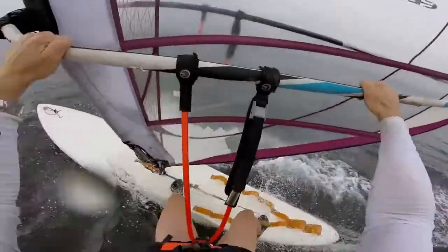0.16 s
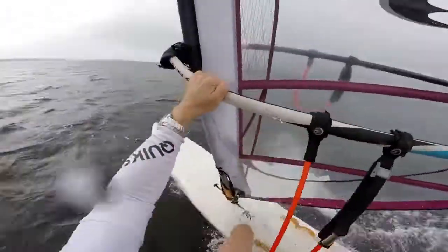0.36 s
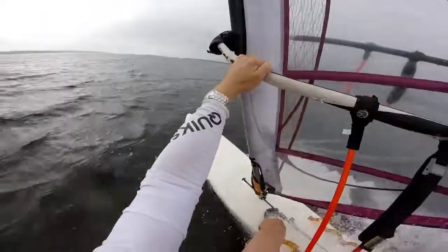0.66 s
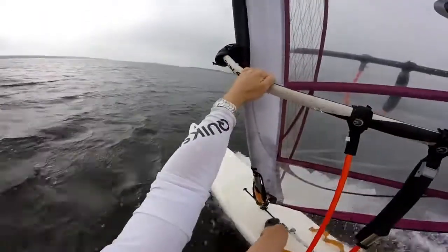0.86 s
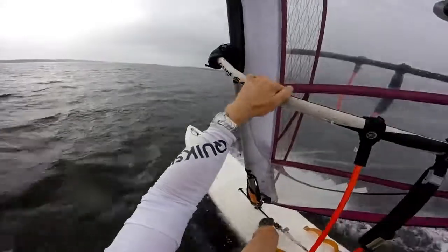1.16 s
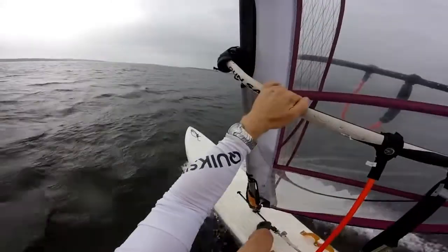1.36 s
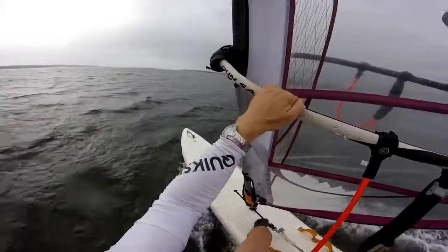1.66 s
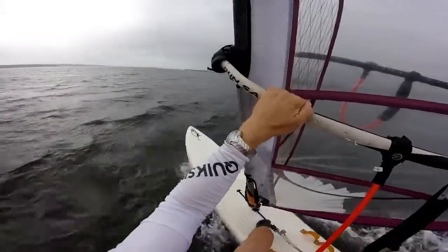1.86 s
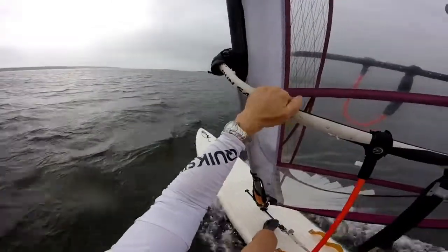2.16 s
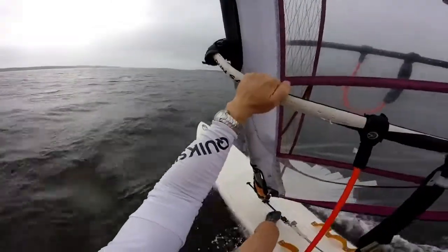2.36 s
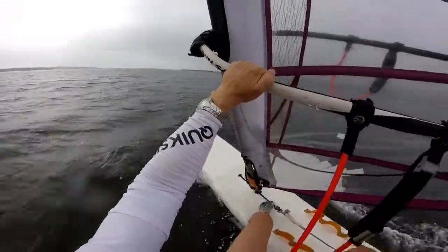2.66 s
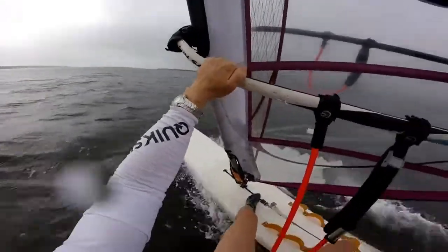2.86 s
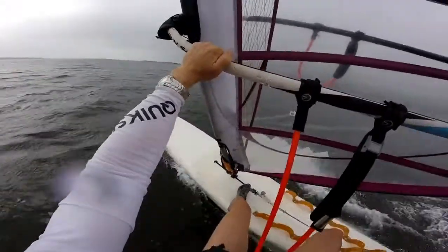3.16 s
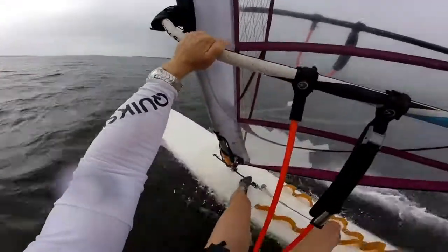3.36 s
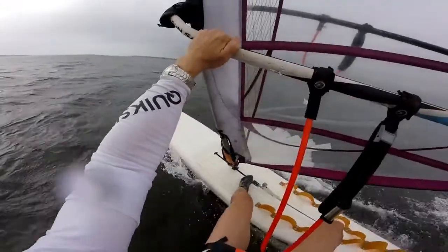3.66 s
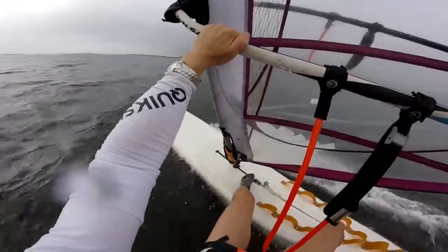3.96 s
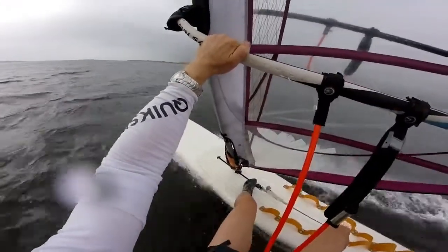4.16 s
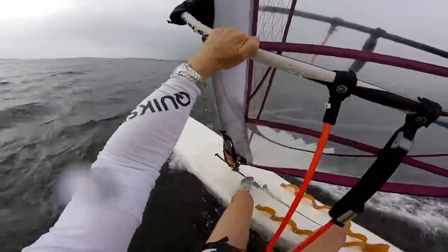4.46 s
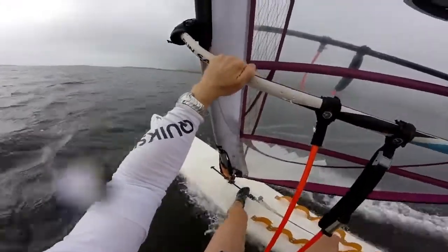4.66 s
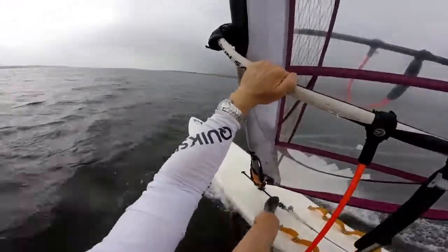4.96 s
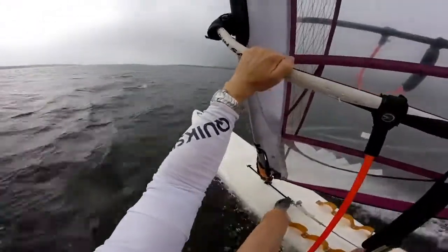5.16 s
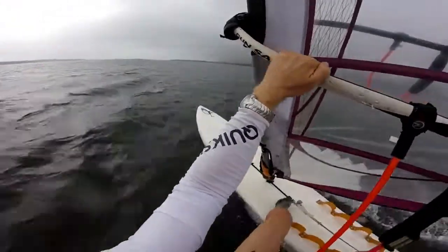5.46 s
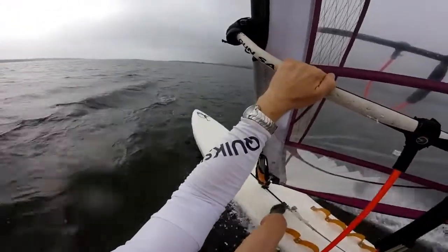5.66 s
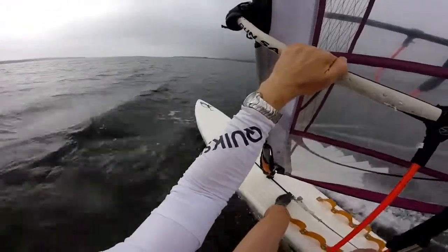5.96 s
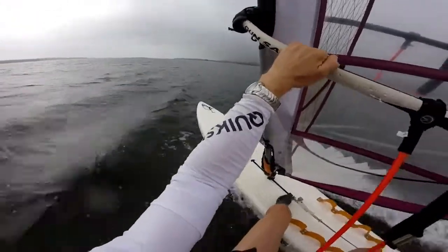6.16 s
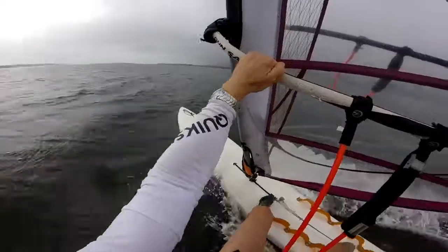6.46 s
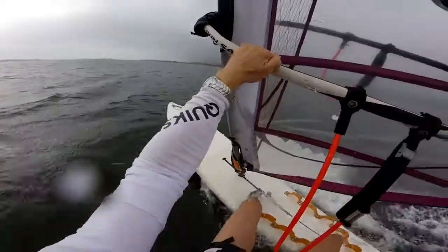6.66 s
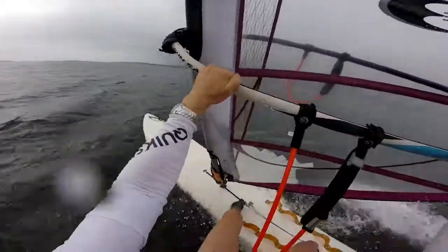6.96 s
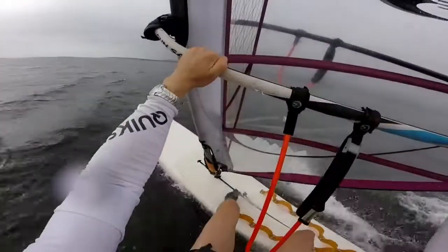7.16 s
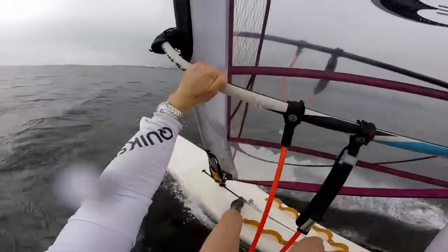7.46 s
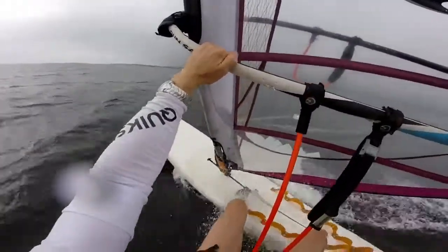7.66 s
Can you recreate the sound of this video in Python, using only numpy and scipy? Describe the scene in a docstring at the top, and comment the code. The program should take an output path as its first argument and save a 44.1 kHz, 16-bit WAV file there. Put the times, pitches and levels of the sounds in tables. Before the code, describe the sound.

On a windsurf board crossing choppy lake water, wind thumps and rumbles irregularly on a sealed camera housing, making its air cavity hum and knock hollowly. Beneath it, foamy water washes along the hull in surges with hissing spray, gurgles and lapping. Brief slaps of chop and small drop ticks punctuate the ride. The sound is close, muffled and single-channel.

```python
"""Wind thumps, rumbles and buffets a sealed camera housing on a windsurfer and excites its air cavity:
shaped noise under gust curves, plus cavity resonances and rings.
Below, lake water washes along the board and sprays (noise, random grains, bubble resonances);
chop slaps the hull (enveloped noise, hull rings) and single drops tick on the case (short pings)."""
import sys
import numpy as np
from scipy import signal
from scipy.io import wavfile
from scipy.ndimage import uniform_filter1d

SR = 44100
rng = np.random.default_rng(int(sys.argv[2]) if len(sys.argv) > 2 else 0)


def to_wav(s):
    """Save 16-bit WAV."""
    ch = np.atleast_2d(s).T  # columns
    pcm = np.round(np.clip(ch, -1, 1) * 32767)  # PCM
    wavfile.write(sys.argv[1], SR, pcm.astype(np.int16))


N = 344862
CONTROL_STEP = 40  # samples between points of slow curves


def from_db(db):
    """Decibels to amplitude gain."""
    return 10 ** (np.asarray(db) / 20)


def rms_one(x):
    """Scale to rms 1."""
    return x / np.sqrt(np.mean(x ** 2) + 1e-20)


def in_time(rows):
    """Interpolate the columns after t/s linearly to every sample."""
    t_s, *columns = np.transpose(rows)
    return [np.interp(np.arange(N) / SR, t_s, column) for column in columns]


def drift(corner_hz):
    """Slow random curve, rms 1: coarse noise through two equal one-pole low-passes."""
    r = np.exp(-2 * np.pi * corner_hz * CONTROL_STEP / SR)
    run_in = 2000
    coarse = rng.standard_normal(N // CONTROL_STEP + run_in + 2)
    slow = signal.lfilter([1], [1, -2 * r, r * r], coarse)[run_in:]
    return np.interp(np.arange(N) / CONTROL_STEP, np.arange(len(slow)), rms_one(slow))


def noise():
    """Two white noises with one second of run-in."""
    return rng.standard_normal((2, N + SR))


def grains(per_s, spread_db):
    """Two trains of random clicks, uneven in size and sign; each train has per_s clicks."""
    sizes = from_db(spread_db * np.minimum(rng.exponential(1, (2, N)), 4))
    signed = sizes * rng.choice([-1, 1], (2, N))
    hits = rng.random((2, N)) < per_s / SR
    return rms_one(signed * hits) + 1e-18


def banded(sources, spectrum, shared_db, own_db, rate_hz):
    """Third-octave bands, sources alternating, flickering together and alone; rms 1."""
    hz, level_db = np.transpose(spectrum)
    out, together = 0, drift(rate_hz)
    edges_hz = 5.6 * 2 ** np.arange(0, 11.7, 1 / 3)
    for k, (low_hz, high_hz) in enumerate(zip(edges_hz, edges_hz[1:])):
        centre_hz = np.sqrt(low_hz * high_hz)
        if .9 * hz[0] < centre_hz < 1.1 * hz[-1]:
            bandpass = signal.butter(2, [low_hz, high_hz], "band", fs=SR, output="sos")
            band = signal.sosfilt(bandpass, sources[k % 2])[-N:]
            band_db = np.interp(np.log(centre_hz), np.log(hz), level_db)
            flicker_db = shared_db * together + own_db * drift(2 * rate_hz)
            out = out + band * from_db(band_db + flicker_db)
    return rms_one(out)


def resonance(x, hz, width_hz):
    """Two-pole resonance, peak gain 1."""
    r = np.exp(-np.pi * width_hz / SR)
    numerator = np.array([1, 0, -1]) * (1 - r * r) / 2
    return signal.lfilter(numerator, [1, -2 * r * np.cos(2 * np.pi * hz / SR), r * r], x)


def pings(rows, rise_s, decay_s, spread):
    """Short decaying sines, each mixed with a noise puff resonating around its pitch."""
    out, t = np.zeros(N + SR), np.arange(SR // 10) / SR
    rise = (t / rise_s) ** 2 / (1 + (t / rise_s) ** 2)
    shape = rise * np.exp(-t / decay_s)
    for start_s, peak_db, hz, noisy in rows:
        width_hz = spread * hz * np.clip(noisy, .1, 1)  # noisier is broader
        puff = shape * rng.standard_normal(len(t))
        for _ in range(2):
            puff = resonance(puff, hz, width_hz)
        tone = np.sin(2 * np.pi * hz * t) * shape
        share = np.clip(noisy, 0, 1)
        ping = (1 - share) * rms_one(tone) + share * rms_one(puff)
        out[round(start_s * SR):][:len(t)] += from_db(peak_db) * ping / np.abs(ping).max()
    return out[:N]


def swells(top_s, peak_db, length_s, tail, floor_db):
    """Gain from the power sum of a floor and Gaussian swells, the fall tail times the rise."""
    t = np.arange(0, N + CONTROL_STEP, CONTROL_STEP) / SR
    since_s = t - top_s[:, None]
    away = since_s / np.maximum(length_s, .01)[:, None] / np.where(since_s > 0, tail, 1)
    power = from_db(2 * peak_db) @ np.exp(-away ** 2)
    return np.sqrt(from_db(2 * floor_db) + np.interp(np.arange(N) / SR, t, power))


def fizz(per_s, q, low_hz, high_hz):
    """Bubbles burst at random and ring briefly, each at one of 14 pitches; rms 1."""
    pitches_hz, dealt = np.geomspace(low_hz, high_hz, 14), rng.integers(0, 14, N)
    clicks, out = grains(per_s, spread_db=-1.0)[0], 0
    for k, hz in enumerate(pitches_hz):
        soft = resonance(clicks * (dealt == k) + 1e-18, hz, 0.74 * hz)  # softens the onset
        out = out + resonance(soft, hz, hz / q)
    return rms_one(out)


# wash spectrum: [f/Hz, relative density/dB per Hz]
WASH_SPECTRUM = [(700, 9), (1200, -6.5), (1800, -2), (2600, 0), (3300, -1), (4200, -10.5), (6000, -7.5),
                 (9000, -63)]


def wash():
    """Foam passing the board: dense bubble clicks on noise; rms 1."""
    foam = noise()[:, :N] + 0.86 * grains(per_s=2700, spread_db=5.0)
    return banded(foam, WASH_SPECTRUM, shared_db=-1.0, own_db=1.35, rate_hz=5.6)


# steady spray spectrum: [f/Hz, relative density/dB per Hz]
SPRAY_SPECTRUM = [(2600, -20.5), (3400, 0), (4200, 5.5), (5600, 2.5), (7000, -8.5), (9000, -23),
                  (11000, -30), (13000, -51), (15500, -58.5)]


def spray(mist):
    """Steady spray: flickering fine-grained noise plus ringing bubbles."""
    hiss = banded(mist, SPRAY_SPECTRUM, shared_db=2.2, own_db=1.2, rate_hz=9.3)
    return hiss + 0.24 * fizz(per_s=270, q=15.0, low_hz=2380, high_hz=7520)


# spectrum of water thrown by a surge: [f/Hz, relative density/dB per Hz]
THROWN_SPECTRUM = [(2600, -10.5), (3400, 5), (4200, 9), (5600, 5.5), (7000, -6), (9000, -22.5),
                   (11000, -30), (13000, -35), (15500, -52)]


def thrown_water(mist):
    """Water thrown by a surge: fast-flickering fine-grained noise plus ringing bubbles."""
    hiss = banded(mist[::-1], THROWN_SPECTRUM, shared_db=2.3, own_db=2.0, rate_hz=33.0)
    return hiss + 0.44 * fizz(per_s=490, q=8.3, low_hz=2880, high_hz=6320)


# steady flow along the board: [t/s, wash level/dB, spray level/dB]
FLOW = [(0, -45, -51.5), (.6, -42.5, -51.5), (1.1, -48.5, -53), (1.6, -45, -62), (2.3, -44, -62.5),
        (3.0, -44, -54), (3.9, -47, -52), (4.7, -47, -55.5), (5.5, -45, -57), (6.3, -44.5, -56),
        (6.9, -46.5, -49), (7.82, -43.5, -52)]
# board ploughs into a wave: [top t/s, wash level/dB, thrown-water level/dB, rise length/s]
PLOUGH_SURGES = [(.01, -53, -44.5, 0.028), (0.333, -46, -45, 0.041), (.395, -42.5, -48.5, 0.077),
                 (0.738, -68, -52.5, 0.11), (0.936, -63, -50.5, 0.051), (1.31, -63, -51, 0.035),
                 (1.787, -54, -54.5, 0.14), (2.077, -44, -67, 0.086), (2.432, -41.5, -64, 0.056),
                 (2.754, -43, -49.5, 0.062), (3.08, -46, -49, 0.064), (3.194, -54, -47.5, 0.034),
                 (3.408, -43, -59, 0.031), (3.975, -62, -51, 0.028), (4.25, -44, -70, 0.089),
                 (4.508, -58, -47, 0.067), (4.74, -47, -51.5, 0.13), (4.96, -59, -52, 0.034),
                 (5.267, -45, -54, 0.086), (5.504, -41.5, -56, 0.061), (5.82, -45.5, -54, 0.075),
                 (6.38, -58, -50, 0.042), (6.64, -43, -46, 0.035), (6.77, -47, -50.5, 0.094),
                 (7.11, -49, -51, 0.058), (7.464, -43, -46.5, 0.023), (7.71, -60, -45.5, 0.11)]
SURGE_TAIL = 1.4  # fall length / rise length
GURGLE_DB, GURGLES_PER_S = -5.5, 400  # large bubbles under the hull; level re steady wash
LAP_DB, MEDIAN_LAPS_PER_S = 3.5, 70  # lapping at the hull; level re steady wash


def water():
    """Steady wash, spray, gurgle and laps; surges swell the wash and throw water."""
    wash_db, spray_db = in_time(FLOW)
    top_s, surge_wash_db, surge_thrown_db, length_s = np.transpose(PLOUGH_SURGES)
    mist_per_s = 2500 * from_db(1.8 * drift(18.0))
    mist = noise()[:, :N] + 0.39 * grains(mist_per_s, spread_db=0.0)
    wash_gain = swells(top_s, surge_wash_db, length_s, SURGE_TAIL, wash_db)
    thrown_gain = swells(top_s, surge_thrown_db, length_s, SURGE_TAIL, -90)
    gurgle = fizz(GURGLES_PER_S, q=6.9, low_hz=1072, high_hz=1313)
    laps_per_s = MEDIAN_LAPS_PER_S * from_db(4.0 * drift(3.0))
    laps = fizz(laps_per_s, q=4.2, low_hz=356, high_hz=755)
    return (wash_gain * wash() + thrown_gain * thrown_water(mist) + from_db(spray_db) * spray(mist)
            + from_db(wash_db + GURGLE_DB) * gurgle + from_db(wash_db + LAP_DB) * laps)


# drops on the case: [t/s, peak level before the case wall/dB, f/Hz, noisy share/0-1]
CASE_DROPS = [(.2094, -43, 5150, .6), (.2922, -33, 4270, 0.4), (.3282, -31, 4800, 1),
              (.3845, -28, 4290, 0.7), (3.0415, -34, 4300, 0.65), (3.125, -36, 4800, 0.7),
              (3.957, -42, 5250, 0.5), (4.283, -37, 3130, .6), (5.243, -38, 3900, 0.6),
              (5.985, -38, 5030, 0.5), (6.1295, -39.5, 3070, 0.7), (6.583, -40, 5500, 1),
              (6.6163, -22, 5300, 0.63), (6.6165, -27, 3350, 0.42), (6.624, -25.5, 5030, 0.75),
              (6.631, -27, 3900, 0.45), (6.648, -34, 3200, 0.4), (6.709, -34, 5000, 1),
              (6.757, -39, 2950, 0.5), (7.0698, -29, 4500, 0.9), (7.0916, -37, 5580, 0.4),
              (7.6445, -32, 5470, 0.9), (7.6634, -38, 5320, 0.9), (7.7194, -32, 4370, 0.6)]


def drops():
    """A drop is a splattering tick, dulled by the case wall."""
    ticks = pings(CASE_DROPS, rise_s=0.0004, decay_s=0.0026, spread=0.7)
    return signal.sosfilt(signal.butter(2, 9000, fs=SR, output="sos"), ticks)


# hard slaps ring the hull, low boom or knock: [t/s, peak level/dB, f/Hz, noisy share/0-1]
HULL_KNOCKS = [(2.794, -15, 247, .2), (4.273, -19.5, 233, 0.4), (4.952, -33, 1550, 0.7),
               (7.452, -14, 236, 0.4)]


def hull_rings():
    """The struck hull rings briefly at each row's pitch."""
    return pings(HULL_KNOCKS, rise_s=0.001, decay_s=0.008, spread=0.6)


# chop on the hull: [t/s, body level/dB, splash decay/s, treble level re body/dB]
HULL_SLAPS = [(0.274, -37, 0.023, 3), (0.331, -30, 0.026, -3), (2.23, -28, 0.018, -3.5),
              (2.746, -27, 0.033, -10), (2.768, -35, 0.025, -6), (3.177, -36, 0.019, 4),
              (3.61, -35, 0.038, 1), (4.148, -39, 0.011, 9), (4.254, -30, 0.02, 0), (4.274, -31, 0.012, -2),
              (4.535, -38, 0.023, -3), (4.95, -26.5, 0.018, -3), (4.97, -34, 0.02, -3),
              (5.231, -30, 0.01, 0), (6.859, -25, 0.026, -21), (7.436, -33, 0.044, -8),
              (7.495, -34.5, 0.027, 5)]
# splash spectrum: [f/Hz, relative density/dB per Hz]
SLAP_SPECTRUM = [(120, 1), (300, -3.5), (650, 6), (1000, 10), (1500, -5), (2200, -11), (3300, -10.5),
                 (4500, -27), (7000, -25), (11000, -55)]
SLAP_TREBLE_HZ, SLAP_RISE_S, CRACK_DECAY_S = 1300, .0012, .004


def slaps():
    """A wave hits the hull: crack, then a broad quickly dying splash, body and treble apart."""
    envelope, t = np.zeros((2, N + SR)), np.arange(SR // 3) / SR
    crack = .6 * np.exp(-t / CRACK_DECAY_S)
    for start_s, body_db, decay_s, treble_db in HULL_SLAPS:
        fall = crack + np.exp(-t / max(decay_s, .004))
        shape = (1 - np.exp(-t / SLAP_RISE_S)) * fall
        gains = from_db([[body_db], [body_db + treble_db]])
        envelope[:, round(start_s * SR):][:, :len(t)] += gains * shape
    splash = noise()[:, :N] + 0.3 * grains(per_s=1700, spread_db=5.0)
    splash = banded(splash, SLAP_SPECTRUM, shared_db=-0.8, own_db=1.5, rate_hz=6.2)
    body = signal.sosfiltfilt(signal.butter(2, SLAP_TREBLE_HZ, fs=SR, output="sos"), splash)
    treble = splash - body
    return envelope[0, :N] * body + envelope[1, :N] * treble + hull_rings()


# cavity pitches, weighted by independent puffs: [f/Hz]
CAVITY_PITCHES = [817, 863, 950]
CAVITY_WIDTH_HZ = 96.5


def cavity():
    """Puffs of air blow the cavity now a little lower, now a little higher; rms 1."""
    out = 0
    for hz in CAVITY_PITCHES:
        puffs = rng.standard_normal(N) * from_db(1.95 * drift(24.0))
        ring = resonance(puffs, hz, CAVITY_WIDTH_HZ)
        out = out + resonance(ring, hz, 4 * CAVITY_WIDTH_HZ)
    return rms_one(out)


# pressure kicks on the cavity: [t/s, peak level/dB, f/Hz, noisy share/0-1]
CAVITY_KICKS = [(0.448, -23, 880, 0.45), (2.124, -25.5, 933, 0.2), (2.393, -21, 950, 0.7),
                (2.79, -21, 945, 0), (2.828, -22, 814, 0.46), (3.156, -23, 850, 0.1),
                (3.618, -21.5, 875, 0.52), (3.633, -28, 925, 0.1), (3.708, -31, 880, 0.1),
                (3.728, -27, 850, 0.44), (4.279, -28, 880, 0.3), (4.549, -25, 947, 0),
                (4.56, -21.5, 905, 0.1), (4.685, -22, 880, 0.26), (4.953, -26, 950, 0.26),
                (4.999, -22, 895, 0.4), (5.233, -36, 950, 0.3), (5.873, -18.5, 810, 0.26),
                (6.359, -25.5, 967, 0.5), (6.406, -18.5, 903, 0.27), (7.498, -17.5, 840, 0),
                (7.692, -24.5, 950, 0.1)]


def kicks():
    """Pressure kicks set the cavity ringing."""
    return pings(CAVITY_KICKS, rise_s=0.00076, decay_s=0.0073, spread=0.61)


# buffeting spectrum: [f/Hz, relative density/dB per Hz]
BUFFET_SPECTRUM = [(80, -9), (140, -2), (220, -2), (450, -7.5), (700, -15), (1150, -29), (1550, -48.5),
                   (2500, -38.5)]


def buffet():
    """Smaller eddies buffet the housing: flickering mid-band noise; rms 1."""
    return banded(noise(), BUFFET_SPECTRUM, shared_db=1.0, own_db=1.12, rate_hz=2.53)


# rumble spectrum: [f/Hz, relative density/dB per Hz]
RUMBLE_SPECTRUM = [(25, -2), (45, 3), (80, -3.5), (130, -6.5), (200, -15.5), (300, -39)]


def rumble():
    """Smaller eddies rumble: fast-flickering low noise; rms 1."""
    return banded(noise(), RUMBLE_SPECTRUM, shared_db=-0.24, own_db=-1.2, rate_hz=28.0)


# thump spectrum before levelling: [f/Hz, relative density/dB per Hz]
THUMP_SPECTRUM = [(12, -25), (18, 10.5), (30, 8.5), (45, 4.5), (70, -9.5), (110, -35)]
# slowest pressure sway: [f/Hz, relative density/dB per Hz]
SWAY_SPECTRUM = [(6, 12.5), (11, -23)]
SWAY_DB = -2  # re thump
THUMP_EVEN = 0.73  # 0 loose noise, 1 steady push


def thump():
    """Large-eddy pressure: low noise evened by its own running level, plus slow sway; rms 1."""
    push = banded(noise(), THUMP_SPECTRUM, shared_db=-1.5, own_db=-1.0, rate_hz=0.63)
    running = uniform_filter1d(np.abs(push), size=1500)
    push = rms_one(push / (running + .1) ** THUMP_EVEN)
    sway = banded(noise(), SWAY_SPECTRUM, shared_db=0.6, own_db=-1.0, rate_hz=1.2)
    return rms_one(push + from_db(SWAY_DB) * sway)


# big eddies: [top t/s, level/dB, rise length/s (10 ms minimum applies)]
BIG_EDDIES = [(0.059, -9, 0.041), (0.145, -14.5, 0.043), (0.253, -11, 0.017), (0.573, -19.5, 0.028),
              (0.8, -12.5, 0.026), (0.968, -14, 0.019), (1.05, -14.5, 0.019), (1.175, -15.5, 0.026),
              (1.426, -10.5, 0.02), (1.575, -18, 0.086), (1.784, -6.5, 0.029), (1.881, -11.5, 0.016),
              (1.995, -16.5, 0.15), (2.305, -13.5, 0.056), (2.637, -15.5, 0.038), (2.85, -15, 0.051),
              (3.052, -9, 0.059), (3.292, -19.5, 0.052), (3.846, -10, 0.065), (3.993, -17.5, 0.03),
              (4.26, -17.5, 0.036), (4.38, -18, 0.034), (4.672, -17, 0.058), (4.837, -9.5, 0.025),
              (5.034, -15, 0.054), (5.193, -19.5, 0.054), (5.335, -13.5, 0.017), (5.74, -17.5, 0.088),
              (6.865, -17, 0.036), (7.342, -12, 0.04), (7.63, -18.5, 0.022), (7.815, -11, 0.0083)]
THUMP_TAIL = 1  # fall length / rise length
THUMP_FLOOR_DB = -30.5  # between big eddies


def eddy_gain():
    """Each big eddy swells the thumping above its floor."""
    return swells(*np.transpose(BIG_EDDIES), THUMP_TAIL, THUMP_FLOOR_DB)


# wind on the housing: [t/s, rumble level/dB, buffeting level/dB, cavity level/dB]
WIND_STRENGTH = [(0, -26.5, -31.5, -39.5), (.45, -20.5, -25.5, -36.5), (.85, -27, -32.5, -39.5),
                 (1.1, -22.5, -30.5, -38), (1.35, -22.5, -28, -40), (1.6, -22, -31, -38),
                 (2.25, -17.5, -26.5, -36), (2.8, -21, -26, -36.5), (3.2, -22.5, -26, -36),
                 (3.65, -25, -28.5, -37.5), (4.1, -25.5, -28.5, -38.5), (4.6, -23, -26, -37),
                 (5.05, -23.5, -29.5, -37.5), (5.45, -20, -29, -33.5), (5.85, -23.5, -27.5, -34),
                 (6.05, -23, -30.5, -37.5), (6.8, -23, -26.5, -36.5), (7.05, -23.5, -29.5, -38.5),
                 (7.45, -22.5, -28, -36.5), (7.82, -26.5, -31.5, -37)]
THUMP_IN_RUMBLE_DB = -21.5  # rumble stirred by big eddies, re thump gain


def wind():
    """Large eddies thump, smaller ones rumble and buffet; the flow blows and kicks the cavity."""
    rumble_db, buffet_db, cavity_db = in_time(WIND_STRENGTH)
    thump_gain = eddy_gain()
    rumble_gain = np.hypot(from_db(rumble_db), from_db(THUMP_IN_RUMBLE_DB) * thump_gain)
    eddies = thump_gain * thump() + rumble_gain * rumble() + from_db(buffet_db) * buffet()
    return eddies + from_db(cavity_db) * cavity() + kicks()


def scene():
    """Water, drops, slaps and wind at one microphone."""
    return (water() + drops() + slaps() + wind())[None]


# housing resonances and dips: [f/Hz, width/Hz, gain/dB]
HOUSING_COLOUR = [(1900, 320, -3.5), (2933, 344, 3.5), (3676, 590, -8.5), (4060, 82, 3), (6560, 160, -3.5),
                  (8700, 580, 3.5), (9400, 1100, -1.5)]
STOPBAND_HZ, STOPBAND_DB = 15700, 70  # stopband edge and attenuation


def record(dry):
    """The housing colours the sound, peaks are rounded, the top is cut."""
    for hz, width_hz, gain_db in HOUSING_COLOUR:
        dry = dry + (from_db(gain_db) - 1) * resonance(dry, hz, width_hz)
    rounded = 1.3 * np.tanh(dry / 1.3)
    lowpass = signal.cheby2(12, STOPBAND_DB, STOPBAND_HZ, fs=SR, output="sos")
    return signal.sosfilt(lowpass, rounded)


dry = scene()
out = record(dry)
to_wav(out)
```